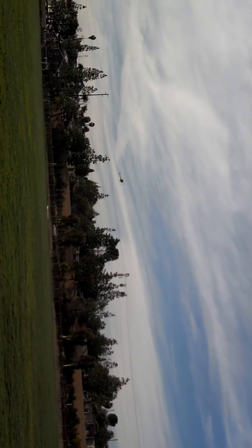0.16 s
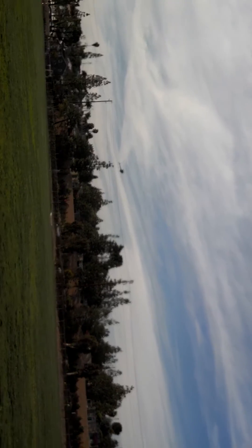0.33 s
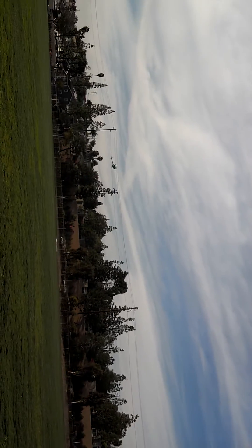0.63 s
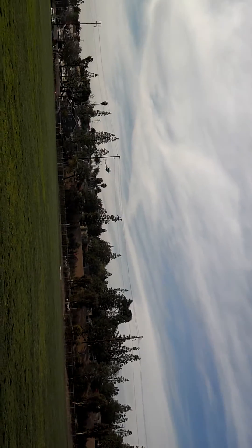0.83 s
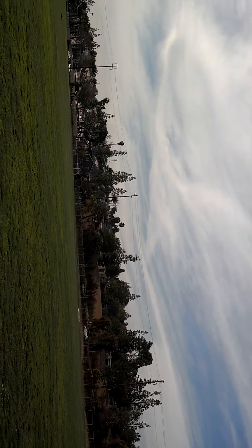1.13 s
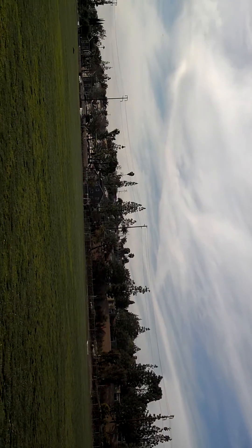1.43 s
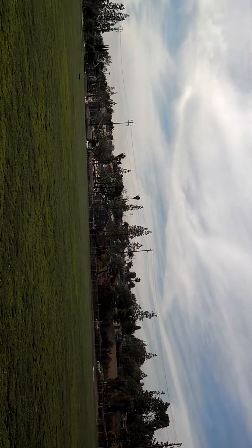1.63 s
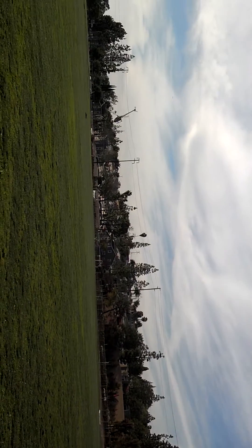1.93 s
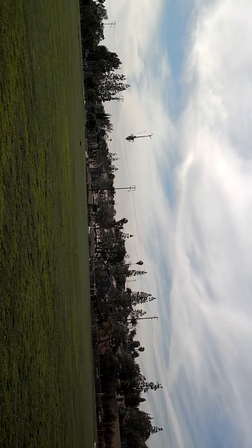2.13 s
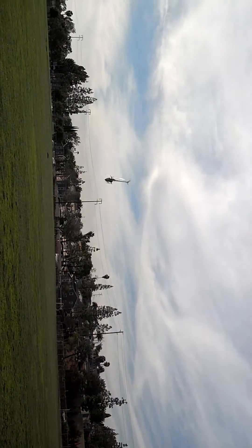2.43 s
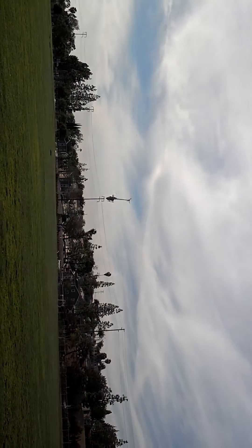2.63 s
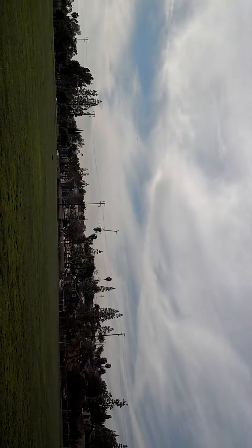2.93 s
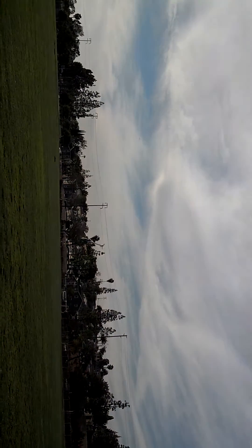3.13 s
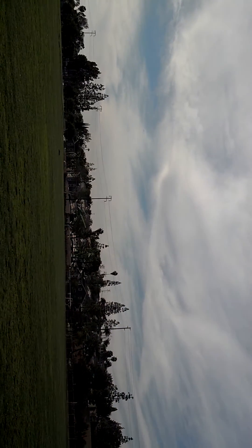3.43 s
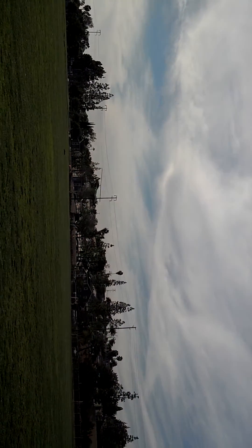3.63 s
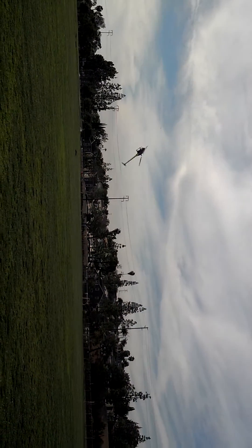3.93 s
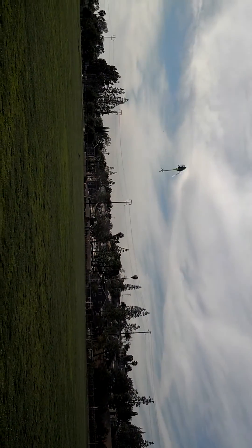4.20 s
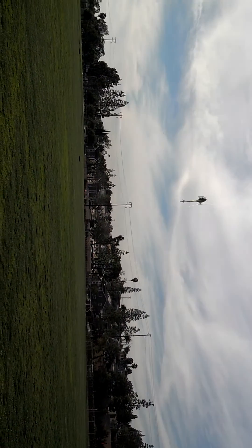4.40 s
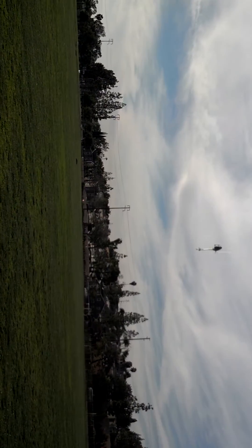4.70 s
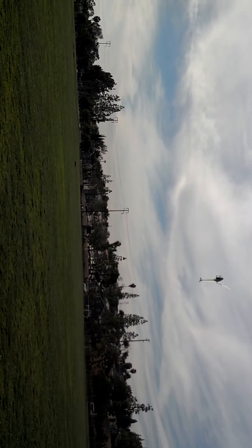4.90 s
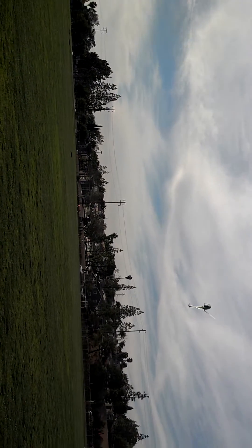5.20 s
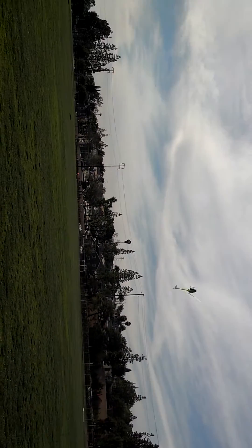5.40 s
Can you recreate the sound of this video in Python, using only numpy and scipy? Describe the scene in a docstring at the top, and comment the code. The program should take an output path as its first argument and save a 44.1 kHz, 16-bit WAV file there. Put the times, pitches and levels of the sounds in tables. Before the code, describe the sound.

Outdoors over an open lawn, a small electric helicopter whines and hisses steadily. Its pitch holds high, sinks around two seconds with crackling blade slaps, rises, then dips and recovers again. The whirr grows fuller near the end. Low, fluttering wind thumps batter one side of a wide stereo phone recording, pausing briefly around two and a half and four and a half seconds.

```python
"""A lawn in gusty wind, over which an electric model helicopter loops, heard by a phone with two ports.
The tail rotor is a sum of harmonics of its shaft; the main blades whoosh as filtered noise that throbs
once per pass and slap as short pulses; the lawn returns a delayed, dulled copy.
Wind hits the exposed port as trains of vortex pulses and the sheltered one as muffled thuds of noise.
Delayed cross-feed between the channels widens the stereo."""
import sys
import numpy as np
from scipy.fft import rfft, irfft, next_fast_len
from scipy.io import wavfile
from scipy.ndimage import uniform_filter1d, map_coordinates

SR = 44100
rng = np.random.default_rng(int(sys.argv[2]) if len(sys.argv) > 2 else 0)


def dump_mix(stems):
    """Bounce the given channels to the path in sys.argv[1] as a 16-bit WAV at rate SR."""
    frames = np.atleast_2d(stems).T  # one column per channel
    limited = np.clip(frames, -1, 1)  # hard clip at full scale
    pcm = np.round(limited * 32767).astype(np.int16)
    wavfile.write(sys.argv[1], SR, pcm)


N = 244755  # samples


def amp(db):
    """Decibel law: the amplitude ratio of a level in dB."""
    return 10 ** (np.asarray(db) / 20)


def unit(x):
    """Normalisation by mean power: x at rms 1."""
    return x / np.sqrt(np.mean(x ** 2) + 1e-20)


def curves(rows):
    """Linear interpolation in time: one value per sample for each column after t/s."""
    s, *columns = np.transpose(rows)
    return [np.interp(np.arange(N) / SR, s, column) for column in columns]


def wobble(rate):
    """Band-limited fluctuation: a smooth curve through random knots, rate of them a second."""
    knots = rng.standard_normal(int(N * rate / SR) + 4)
    return map_coordinates(knots, [np.arange(N) * rate / SR])


def coloured(x, spectrum):
    """Minimum-phase filtering: x through a causal filter with the given (f/Hz, level/dB) points."""
    m = next_fast_len(N + 8192)
    hz, db = np.transpose(spectrum)
    level = np.interp(np.log(np.fft.rfftfreq(m, 1 / SR) + 1), np.log(hz), db)
    # folding the cepstrum onto positive times makes the response causal
    cepstrum = irfft(np.log(amp(level)), m)
    cepstrum[1:m // 2] *= 2
    cepstrum[m // 2 + 1:] = 0
    return irfft(rfft(x, m) * np.exp(rfft(cepstrum)), m)[:N]


def delayed(x, ms):
    """Propagation delay: x later by ms, which may change with time."""
    return map_coordinates(x, [np.arange(N) - ms * SR / 1000], mode="nearest")


def bursts(start, length, db, rise, fall, lull_db):
    """Exponential growth and decay: bursts climb and sink at steady dB/s, summed in power over a lull."""
    t = np.arange(0, N, 32) / SR
    start, end = start[:, None], (start + length)[:, None]
    before, after = np.clip(start - t, 0, None), np.clip(t - end, 0, None)
    level = db[:, None] - rise * before - fall * after
    power = np.sum(amp(level) ** 2, axis=0) + amp(lull_db) ** 2
    return np.interp(np.arange(N) / SR, t, np.sqrt(power))


def eddies(spectrum, lumps, steady):
    """Turbulent pressure: lumpy noise, coloured, its swells evened out by steady (0-1), at rms 1."""
    x = coloured(lumps * rng.standard_normal(N), spectrum)
    swell = np.abs(uniform_filter1d(x ** 2, size=SR // 25)) + 1e-12
    return unit(x / swell ** (steady / 2))


# thuds of wind on the sheltered port: t/s of the middle, level/dB
THUD_TIMES = [(1.237, -27), (1.297, -19), (1.372, -40), (1.816, -24), (2.275, -24), (2.434, -31),
              (2.479, -33), (2.585, -21.5), (2.761, -20), (2.829, -26), (3.243, -29), (4.595, -30.5),
              (4.699, -38), (4.904, -25), (5.044, -39), (5.153, -32)]
# spectrum of the muffled wind: f/Hz, relative level/dB
MUFFLED_SPECTRUM = [(30, -30), (60, 1), (90, 1.5), (130, 5), (200, 2), (300, 0), (450, -16), (800, -34.5),
                    (2500, -120)]


def sheltered_wind():
    """Low-pass shielding: only dull thuds of turbulent noise reach the sheltered port."""
    s, db = np.transpose(THUD_TIMES)
    hold_s, slope_db_per_s, lull_db = 0.0097, 498, -45.5
    level = bursts(s - hold_s / 2, hold_s, db, slope_db_per_s, slope_db_per_s, lull_db)
    return level * eddies(MUFFLED_SPECTRUM, amp(6.0 * wobble(30)), steady=0.35)


def vortices(s, hz, gain, slant):
    """Vortex convection: each low-pressure core gives a small push, a sharp suction, a slower recovery."""
    k = np.arange(-300, 700)  # samples around the suction
    cycle = k / SR * hz[:, None]
    cycle = np.where(cycle > 0, 0.59 * cycle, cycle)
    shape = -np.exp(-(cycle / .5) ** 2) * np.cos(2 * np.pi * cycle + slant[:, None])
    at = np.clip(np.round(s * SR).astype(int)[:, None] + k, 0, N)
    return np.bincount(at.ravel(), (gain[:, None] * shape).ravel(), N + 1)[:N]


# large, middling and small vortices: typical f/Hz, rate per s, scatter of size/dB before limiting
VORTEX_SIZES = [(199.5, 120, 4.5), (356.4, 260, 6), (710, 260, 8)]
# the same three: level/dB over a burst's strength, dB per dB of tilt, rise/(dB/s), fall/(dB/s),
# lull level/dB
VORTEX_SHEDDING = [(-1.5, -1.18, 450, 551, -41), (0.5, 0.08, 654, 811, -66), (-16.5, 0.7523, 811, 998, -52)]
# bursts of wind: start t/s, length/s, strength/dB (relative), tilt from large toward small vortices/dB
WIND_GUSTS = [(0.004, 0.026, -26.5, 11), (0.078, 0.015, -19.5, -0.5), (0.204, 0.0095, -33.5, -12.5),
              (0.263, 0.025, -30, -9), (0.345, 0.026, -30.5, -15), (0.412, 0.024, -24.5, -2),
              (0.47, 0.044, -22.5, -6), (0.538, 0.11, -22, -3.5), (0.678, 0.058, -26.5, -7),
              (0.747, 0.032, -24.5, -8.5), (0.799, 0.027, -21.5, 3), (0.862, 0.051, -29, -11.5),
              (0.963, 0.028, -19, 1), (1.04, 0.018, -19, -3.5), (1.107, 0.014, -18, 7.5),
              (1.202, 0.039, -23, -2.5), (1.276, 0.0082, -17.5, 13), (1.363, 0.024, -21, -8),
              (1.466, 0.078, -26.5, -5.5), (1.575, 0.052, -18.5, 0.5), (1.662, 0.044, -17.5, 6.5),
              (1.768, 0.0094, -21.5, -0.5), (1.806, 0.011, -24, 0), (1.845, 0.032, -17.5, 5),
              (1.919, 0.036, -22.5, 19), (1.984, 0.045, -20, 0.5), (2.078, 0.055, -19.5, -2),
              (2.192, 0.012, -25, -3.5), (2.28, 0.04, -37.5, -11.5), (2.43, 0.018, -44, -15),
              (2.755, 0.0085, -24.5, -2), (2.884, 0.044, -26.5, -3.5), (2.981, 0.028, -21.5, -2),
              (3.072, 0.0078, -21.5, 26.5), (3.133, 0.01, -21, -5.5), (3.163, 0.052, -21.5, 6),
              (3.255, 0.021, -22, 19), (3.3, 0.057, -20, 14.5), (3.384, 0.14, -21.5, 13.5),
              (3.548, 0.12, -21, 11), (3.719, 0.058, -24, 10.5), (3.816, 0.075, -18, 0),
              (4.03, 0.01, -31.5, -11.5), (4.088, 0.02, -46.5, -15.5), (4.135, 0.032, -43, -4),
              (4.289, 0.007, -50, -20.5), (4.693, 0.028, -45, -19), (4.885, 0.064, -19.5, 1.5),
              (5.012, 0.0027, -25, -5), (5.113, 0.056, -23.5, 2), (5.21, 0.039, -21.5, -2.5),
              (5.261, 0.016, -32, 15), (5.306, 0.021, -19.5, 1), (5.382, 0.094, -23, -1),
              (5.511, 0.025, -18, 5.5)]
# single vortices, strong and faint, heard as separate pops of wind: t/s (1.355 ms ahead of the suction),
# relative level/dB, f/Hz of the onset (the recovery is slower)
SINGLE_VORTICES = [(0.0772, -28.5, 874), (0.5087, -20, 486), (0.5596, -19.5, 850), (0.566, -20, 597),
                   (0.5723, -19, 500), (0.5898, -14.5, 410), (0.5956, -16.5, 416), (0.6158, -19.5, 420),
                   (0.6211, -23, 597), (0.625, -22, 500), (0.635, -27, 500), (0.641, -27, 500),
                   (0.6658, -25, 500), (0.6823, -22, 420), (0.694, -20.5, 490), (0.7078, -24.5, 500),
                   (0.718, -22, 500), (0.7503, -17, 500), (0.7674, -19, 596), (0.7781, -24.5, 1250),
                   (0.7981, -20, 720), (0.8304, -27, 860), (0.8666, -19.5, 414), (0.973, -22, 730),
                   (0.9814, -17, 417), (1.0404, -18, 416), (1.0523, -22, 722), (1.0633, -22, 870),
                   (1.0764, -29, 600), (1.1042, -17, 865), (1.1097, -17, 600), (1.1242, -19, 590),
                   (1.227, -23, 498), (1.2312, -18, 417), (1.279, -18.5, 1040), (1.2824, -16, 420),
                   (1.3663, -11.5, 513), (1.4603, -17, 500), (1.4896, -16, 423), (1.5291, -22.5, 860),
                   (1.591, -12, 500), (1.5965, -10.5, 420), (1.606, -29, 600), (1.6107, -17, 600),
                   (1.6187, -13, 606), (1.628, -22, 1030), (1.636, -19.5, 1240), (1.6683, -20, 600),
                   (1.6791, -17.5, 1020), (1.686, -25, 500), (1.6924, -16, 500), (1.6984, -37, 1030),
                   (1.8116, -28, 1030), (1.8488, -20.5, 865), (1.857, -15.5, 495), (1.8844, -14.5, 420),
                   (1.9131, -20.5, 600), (1.9216, -21, 860), (1.928, -24, 1250), (1.943, -24, 597),
                   (1.9489, -19.5, 497), (2.0066, -22, 720), (2.0271, -18, 1030), (2.0469, -15, 610),
                   (2.0676, -17.5, 860), (2.0738, -15.5, 500), (2.0836, -14, 500), (2.0975, -22, 600),
                   (2.1119, -20, 500), (2.758, -24, 500), (2.7628, -22, 500), (2.9895, -20.5, 720),
                   (3.0344, -16, 600), (3.0493, -18, 500), (3.0659, -16.5, 500), (3.076, -14, 840),
                   (3.0826, -15, 720), (3.0878, -20.5, 423), (3.1023, -29, 1030), (3.1145, -13.5, 497),
                   (3.1682, -25, 600), (3.1885, -16.5, 420), (3.1947, -21, 500), (3.2026, -30, 600),
                   (3.2167, -25.5, 1025), (3.253, -20, 1030), (3.256, -22, 1250), (3.2612, -23, 720),
                   (3.267, -29, 600), (3.277, -25, 1250), (3.2978, -20, 860), (3.301, -20.5, 720),
                   (3.308, -14, 720), (3.3121, -16, 500), (3.318, -16, 500), (3.3235, -18, 600),
                   (3.331, -21, 860), (3.3399, -18.5, 600), (3.3483, -16.5, 500), (3.3522, -22.5, 600),
                   (3.3648, -17, 500), (3.3738, -18, 600), (3.391, -17, 505), (3.3988, -15, 420),
                   (3.4065, -25, 1030), (3.4113, -19, 500), (3.418, -18, 500), (3.4226, -19, 600),
                   (3.4298, -14, 420), (3.4381, -20, 595), (3.452, -20.6, 860), (3.459, -26, 860),
                   (3.462, -26, 600), (3.468, -22, 600), (3.4771, -21, 500), (3.4835, -23, 420),
                   (3.489, -15, 500), (3.4932, -13, 497), (3.4988, -23, 600), (3.5072, -10, 424),
                   (3.5128, -25.7, 1250), (3.533, -29, 720), (3.5407, -15, 720), (3.547, -19.5, 720),
                   (3.5545, -15, 720), (3.562, -25, 500), (3.5655, -21.5, 600), (3.5759, -17.5, 494),
                   (3.5804, -16.5, 500), (3.584, -18, 595), (3.5913, -18.5, 497), (3.6077, -23.5, 500),
                   (3.6127, -15.5, 500), (3.6192, -19.5, 860), (3.629, -15, 500), (3.6468, -20, 500),
                   (3.6563, -28, 1030), (3.7505, -24.5, 850), (3.7579, -21.5, 420), (3.836, -18, 500),
                   (3.8394, -17, 604), (3.8428, -24, 496), (3.8486, -16, 500), (3.8643, -16.5, 507),
                   (3.8804, -19.5, 496), (3.8877, -21.5, 417), (4.8863, -14.5, 423), (4.9062, -14, 615),
                   (4.9136, -24.5, 720), (4.9202, -22, 724), (4.9284, -22, 500), (5.0132, -17, 670),
                   (5.1239, -13, 425), (5.1507, -18.5, 510), (5.2152, -15.5, 610), (5.2448, -24, 600),
                   (5.2644, -23, 860), (5.2771, -9.5, 430), (5.3451, -18.5, 606), (5.3507, -21, 740),
                   (5.3859, -25.5, 1240), (5.4233, -25.8, 860), (5.5004, -14.5, 1290), (5.5073, -11.5, 610),
                   (5.5212, -24, 600)]
# wind path to the membrane: f/Hz, level/dB
PORT_RESPONSE = [(20, -1), (60, -16), (110, 0.5), (1500, 1.5), (3000, -6.5), (8000, -57.5)]


def exposed_wind():
    """Vortex shedding: lumpy trains of three sizes and separate single pops, on a saturating membrane."""
    lump, gusts = wobble(40), np.zeros(N)
    limit_db = 8  # bound on a vortex's departure from its typical size
    start, length, strength_db, tilt_db = np.transpose(WIND_GUSTS)
    for (over_db, lean, rise, fall, lull_db), (hz, rate, scatter_db) in zip(VORTEX_SHEDDING, VORTEX_SIZES):
        burst_db = strength_db + over_db + lean * tilt_db
        level = bursts(start, length, burst_db, rise, fall, lull_db)
        draw = rng.standard_normal((int(N / SR * rate), 4))
        s = np.clip((np.arange(len(draw)) + .5 * draw[:, 0]) / rate, 0, (N - 1) / SR)
        index = (s * SR).astype(int)
        size_db = scatter_db * draw[:, 1] + 3.1 * lump[index]
        size = amp(limit_db * np.tanh(size_db / limit_db))
        pitch = hz * np.exp(0.16 * draw[:, 2] + 0.2 * wobble(25)[index])
        train = vortices(s, pitch, size, 0.8 * draw[:, 3])
        # chance swells are partly evened out, so the gust sets the level
        swell = np.abs(uniform_filter1d(train ** 2, size=SR // 20)) + 1e-12
        gusts += level * unit(train / swell ** 0.19)
    s, db, hz = np.transpose(SINGLE_VORTICES)
    singles = vortices(s + 0.001355, hz, amp(db + 7.0), 0.11 * rng.standard_normal(len(s)))
    pressure = coloured(gusts + singles, PORT_RESPONSE)
    return pressure / (1 + np.abs(pressure / .66) ** 4) ** (1 / 4)  # the membrane stiffens at large swings


# echo off the lawn, later as the machine climbs: t/s, delay/ms, strength (0-1) before dulling
GROUND_ECHO = [(0, 1.62, 0.17), (.45, 1.56, 0.42), (.7, 1.44, 0.06), (1, 1.22, 0.14), (1.3, 1.18, 0.33),
               (1.7, 0.826, 0.6), (1.9, 0.81, 0.34), (2.25, 1.735, 0.62), (2.42, 1.756, 0.4),
               (2.6, 1.775, 0.38), (2.75, 1.78, 0.28), (3, 1.76, 0.17), (3.3, 1.21, 0.3), (3.6, 0.97, 0.15),
               (3.95, 1.37, 0.32), (4.17, 1.64, 0.51), (4.35, 2.17, 0.21), (4.65, 2.4, 0.12),
               (4.9, 2.5, 0.04), (5.2, 2.486, 0.24), (5.55, 2.13, 0.4)]
# the lawn dulls its echo: f/Hz, level/dB
GRASS_RESPONSE = [(100, 11), (3000, 3.5), (6000, 0), (10000, -8.5), (16000, -16)]


def with_ground_echo(direct):
    """Specular reflection: a delayed, dulled copy combs the direct sound, the sum scaled by strength."""
    ms, strength = curves(GROUND_ECHO)
    echo = delayed(coloured(direct, GRASS_RESPONSE), ms)
    return (direct + strength * echo) / np.sqrt(1 + strength ** 2)


# blade whoosh: t/s, body level/dB, tip hiss over body/dB, top treble over the rest of the hiss/dB
# (body and tip levels are relative: the function trims both)
BLADE_WHOOSH = [(0.0, -54.5, -1, -7), (0.12, -59.5, -1, -7), (0.3, -59.5, -2.5, -8.5), (0.46, -59.5, 1, -6),
                (0.62, -70.5, -1.5, -3), (0.77, -62, 3, -7), (1.02, -56.5, -1.5, -4.5),
                (1.33, -58.5, 2.5, -7), (1.46, -57.5, -2.5, -4), (1.7, -60.5, -2, -2),
                (2.0, -55.5, -2.5, -1.5), (2.22, -51.5, 1, -4.5), (2.75, -56.5, 2.5, -4),
                (3.0, -52, 2.5, -3.5), (3.17, -61.5, -5, 5), (3.3, -53.5, -5.5, -3.5),
                (3.55, -56.5, 1.5, -5), (3.9, -64, 0, -0.5), (4.12, -61.5, -2.5, -0.5),
                (4.25, -51.5, -3.5, -2), (4.48, -51.5, 3.5, -4), (4.65, -50, 0.5, -6.5), (4.8, -49, 0, -6),
                (4.96, -49.5, 1, -4.5), (5.06, -56, 2.5, -4.5), (5.17, -57, 3, -3.5), (5.3, -54, 4.5, -6),
                (5.55, -56, 1.5, -4)]
# spectrum of the body: f/Hz, relative level/dB
BODY_SPECTRUM = [(60, -72), (200, -12), (500, -7.5), (1000, 3), (1600, 5.5), (2100, 8), (2600, 6.5),
                 (3300, 2.5), (4700, 0), (6200, -23.5), (8000, -42.5), (16000, -43.5)]
# spectrum of the tip hiss: f/Hz, relative level/dB
TIP_SPECTRUM = [(1000, -67), (3000, -67), (5500, 4), (7500, -1.5), (9500, -3), (12000, -8), (15500, -2.5)]


def whoosh(passes):
    """Broadband turbulence, modulated at blade-pass rate: a shared part and independent noise per port."""
    body_db, tips_db, top_db = curves(BLADE_WHOOSH)
    throb = 1 + 0.14 * np.cos(2 * np.pi * passes)
    level = throb * amp(body_db + 1.2 * wobble(12) + 1.2 * wobble(150))
    swell_db = 1.7 * wobble(8)  # the tip hiss swells on its own
    top_treble_hz = 8300  # lower edge of the top treble

    def air(spectrum):
        """Coloured noise under the common throb."""
        return level * unit(coloured(rng.standard_normal(N), spectrum))

    def tip_hiss():
        """Tip noise, its top treble levelled apart by band splitting."""
        x = air(TIP_SPECTRUM)
        top = irfft(rfft(x) * (np.fft.rfftfreq(N, 1 / SR) > top_treble_hz), N)
        return amp(tips_db + swell_db) * (x + (amp(top_db) - 1) * top)

    shared = amp(3.0) * air(BODY_SPECTRUM) + amp(-2.5) * tip_hiss()
    # part of the whoosh is independent noise at each port, which widens it
    independent = [air(BODY_SPECTRUM) + amp(-5) * tip_hiss() for _ in range(2)]
    return shared, np.array(independent)


# runs of blade slap: t/s of the middle, relative peak level/dB, half length/s (to 1/e of the peak),
# relative level of the bright edge/dB
SLAP_RUNS = [(1.7197, -29.5, 0.075, 7.5), (1.817, -27.5, 0.029, 4), (2.163, -32.5, 0.019, -9),
             (2.2382, -23, 0.05, 0.5), (2.3133, -23, 0.023, -3), (2.374, -32.5, 0.051, -2),
             (2.45, -30.5, 0.039, -7), (2.522, -32.5, 0.039, 0), (2.613, -27.5, 0.07, -1),
             (2.718, -33.5, 0.062, -2), (2.862, -34, 0.049, 5), (2.936, -36, 0.063, 8),
             (4.218, -29, 0.042, -11), (5.285, -32.5, 0.04, 9.5), (5.446, -32.5, 0.057, 10.5)]
# spectrum of the pressure drop: f/Hz, level/dB
SLAP_SPECTRUM = [(150, -21), (600, 6.5), (1200, 4), (2500, 0.5), (5000, -62), (9000, -35), (15000, -60)]
# spectrum of the bright edge: f/Hz, level/dB
EDGE_SPECTRUM = [(600, -47), (2000, -11), (3300, -12.5), (5000, -21.5), (8000, -38), (15000, -56)]


def slaps(pass_hz):
    """Blade-vortex interaction: a blade cuts the vortex of the one before, a crack per pass in each run."""
    thud, edge = np.zeros((2, N + SR))
    k, t = np.arange(-12, 12) + .5, np.arange(220) / SR
    for s, db, half, edge_db in SLAP_RUNS:
        at = k / pass_hz[round(s * SR)]
        peak = amp(db + 18 + rng.normal(0, 2.2, len(k)))  # scatter from pass to pass, dB
        size = peak * np.exp(-np.abs(at / half) ** 3)
        for when, gain in zip(s + at, size):
            first = round(when * SR)
            thud[first] -= gain  # the pressure drop, one shape in every pass
            crackle = np.exp(-t / 0.00052) * rng.standard_normal(len(t))
            edge[first:][:len(t)] += gain * amp(edge_db - 9.5) * crackle
    return coloured(thud[:N], SLAP_SPECTRUM) + coloured(edge[:N], EDGE_SPECTRUM)


# tail rotor tones: shaft order, relative level/dB; even orders are passes of the two-bladed rotor
ORDER_LEVELS = [(2, 0), (3, -3), (4, -6), (5, -9), (6, -7), (7, -11), (8, 2), (9, -15), (10, 0), (11, -12),
                (12, -4), (13, -10), (14, -10), (15, -9), (16, -1), (17, 0), (18, -5), (19, 0), (20, -8),
                (21, 5), (22, -9), (23, 7), (24, -2), (25, -3), (26, -10), (27, -8), (28, -9), (29, -9),
                (30, -9), (31, -11), (32, -6), (34, -14), (36, -12), (38, -13)]
# group levels, relative: t/s, orders 2-6/dB, 7-9/dB, 10/dB, 11-14/dB, from 15/dB,
# odd over even orders up to 14/dB, from 15/dB
GROUP_LEVELS = [(0.0, -51, -76, -59, -60, -80, 2, -2), (0.28, -50, -76, -59, -59, -76, 3, -5),
                (0.47, -50, -72, -53, -56, -68, 3, -8), (0.54, -54, -70, -61, -62, -76, 1, -2),
                (0.64, -58, -66, -60, -66, -76, 1, 5), (0.8, -57, -63, -57, -63, -65, 3, 2),
                (1.05, -55, -68, -56, -62, -62, 1, 2), (1.17, -56, -68, -64, -66, -61, 0, 1),
                (1.35, -56, -68, -64, -68, -59, 0, 1), (1.5, -54, -69, -64, -64, -76, 1, -2),
                (2.0, -54, -68, -63, -63, -80, 0, -4), (2.3, -51, -61, -66, -64, -78, -4, -5),
                (2.7, -51, -61, -62, -61, -78, -5, -5), (3.0, -50, -61, -57, -58, -76, -2, -5),
                (3.22, -52, -61, -63, -63, -80, -4, -6), (3.6, -50, -61, -63, -63, -80, -5, -6),
                (3.8, -49, -64, -62, -64, -80, -6, -6), (4.05, -49, -65, -61, -66, -82, -9, -6),
                (4.22, -48, -58, -60, -64, -80, -5, -6), (4.4, -50, -53, -58, -55, -78, 0, -6),
                (4.62, -48, -57, -56, -46, -72, -1, -3), (4.75, -48, -52, -57, -55, -72, -2, -4),
                (4.95, -50, -56, -58, -59, -74, -1, -4), (5.15, -55, -64, -62, -64, -78, -2, -5),
                (5.56, -55, -65, -64, -64, -79, -2, -5)]


def tail_rotor(turns):
    """Harmonic series of a rotating source: shaft orders, each fading in and out as the machine turns."""
    *group_db, odd_low_db, odd_high_db = curves(GROUP_LEVELS)
    out = np.zeros(N)
    for order, db in ORDER_LEVELS:
        group = int(order > 6) + int(order > 9) + int(order > 10) + int(order > 14)
        level_db = db + group_db[group] + 2.5
        if order % 2:
            level_db = level_db + (odd_high_db if order > 14 else odd_low_db)
        waver = .017 * order * wobble(25) + rng.uniform(0, 2 * np.pi)  # phase, rad
        flutter_db = 2.5 * wobble(5) + 1.6 * wobble(30)
        out += amp(level_db + flutter_db) * np.sin(2 * np.pi * order * turns + waver)
    return out


# the exposed port is farther from the machine, by the angle it flies at: t/s, lag/ms
EXPOSED_LAG = [(0, .113), (1.3, .113), (1.85, .155), (2.2, .14), (2.55, .102), (3.25, .082), (3.65, .095),
               (4.0, .14), (4.3, .12), (4.9, .092), (5.55, .092)]
# the phone's body shades the exposed port: f/Hz, level/dB
BODY_SHADOW = [(500, -3.5), (2000, -1.5), (3500, 1.5), (4800, 0.5), (7000, -3.5), (10000, -3.5), (16000, 1)]


def at_exposed_port(near, independent):
    """Path difference and diffraction: the rotor sound arrives late and shaded by the phone."""
    return coloured(delayed(near, *curves(EXPOSED_LAG)) + independent, BODY_SHADOW)


# tail shaft speed: t/s, f/Hz
SHAFT_SPEED = [(0.0, 190.8), (0.56, 192.2), (0.78, 192.6), (1.4, 192.5), (1.6, 191.2), (1.86, 188.2),
               (2.08, 180), (2.2, 174.2), (2.28, 173.3), (2.72, 181.1), (3.04, 184.2), (3.22, 183.7),
               (3.52, 172.3), (3.6, 171.9), (3.82, 173.8), (4.0, 172.3), (4.13, 167.9), (4.25, 167.4),
               (4.54, 174.9), (4.88, 180.8), (5.2, 183.7), (5.48, 185.2), (5.56, 184.8)]


def helicopter():
    """Geared rotation: one shaft speed drives tail tones, whoosh and slaps, heard with their ground echo."""
    gear = 2.63  # tail shaft turns per main blade pass
    shaft_hz = curves(SHAFT_SPEED)[0]
    turns = np.cumsum(shaft_hz) / SR
    rush, independent = whoosh(turns / gear)
    direct = tail_rotor(turns) + rush + slaps(shaft_hz / gear)
    near = with_ground_echo(direct)
    return np.array([near + independent[0], at_exposed_port(near, independent[1])])


def scene():
    """Superposition of pressures: rotors plus wind at the sheltered port, then at the exposed one."""
    return helicopter() + np.array([sheltered_wind(), exposed_wind()])


def record(dry):
    """Delayed cross-feed: each channel loses a late copy of the other for width; then a band limit."""
    lag, cross_db, top_hz = 16, -.35, 15800  # samples, dB, Hz
    late = np.pad(dry, ((0, 0), (lag, 0)))[::-1, :N]
    wide = dry - amp(cross_db) * late
    m = next_fast_len(N + 8192)
    passband = np.fft.rfftfreq(m, 1 / SR) < top_hz
    return irfft(rfft(wide, m) * passband, m)[:, :N]


dry = scene()
out = record(dry)
dump_mix(out)
```